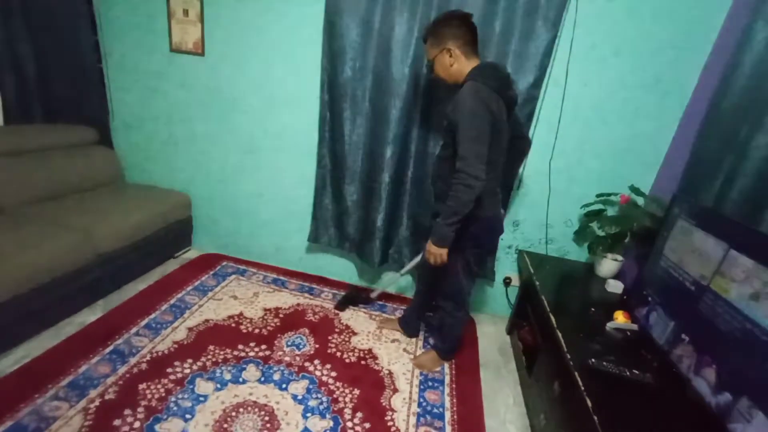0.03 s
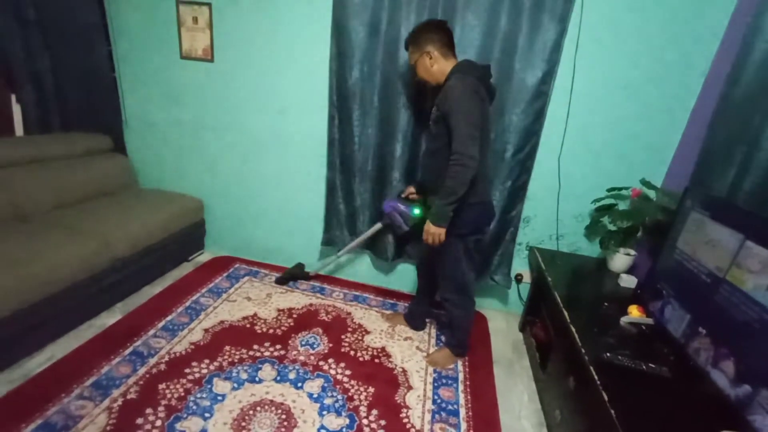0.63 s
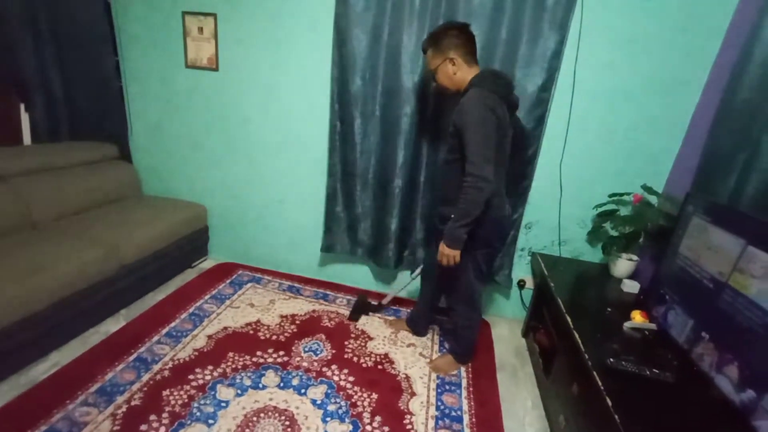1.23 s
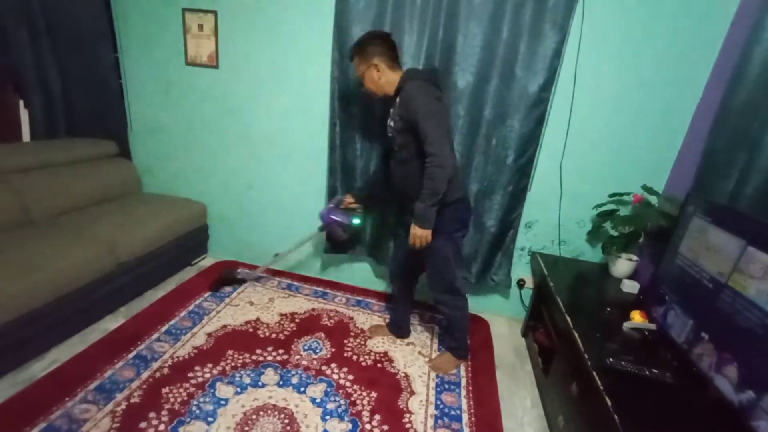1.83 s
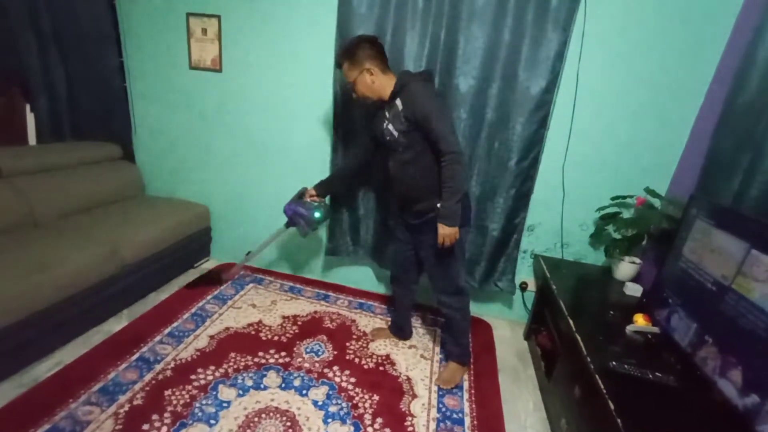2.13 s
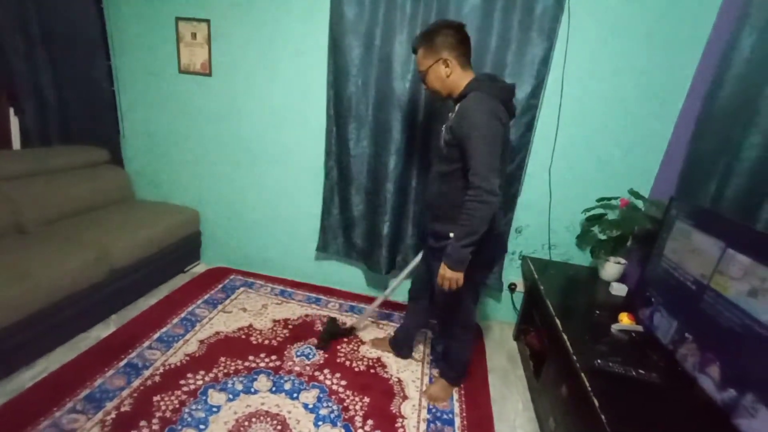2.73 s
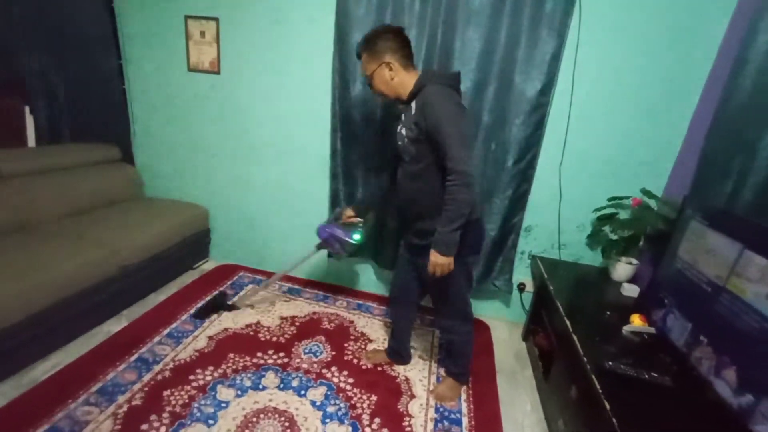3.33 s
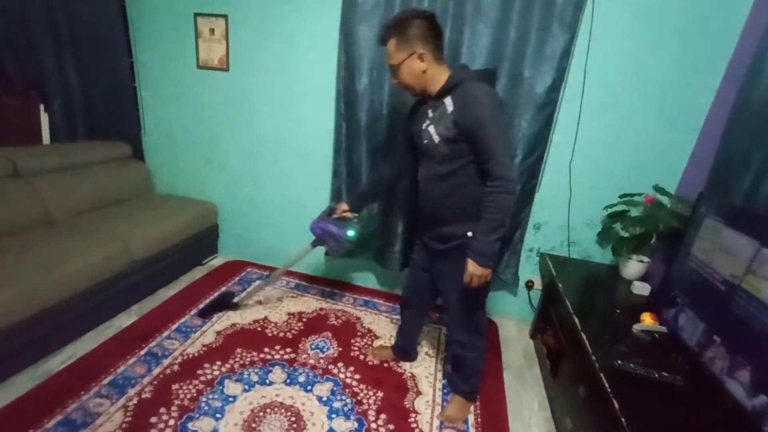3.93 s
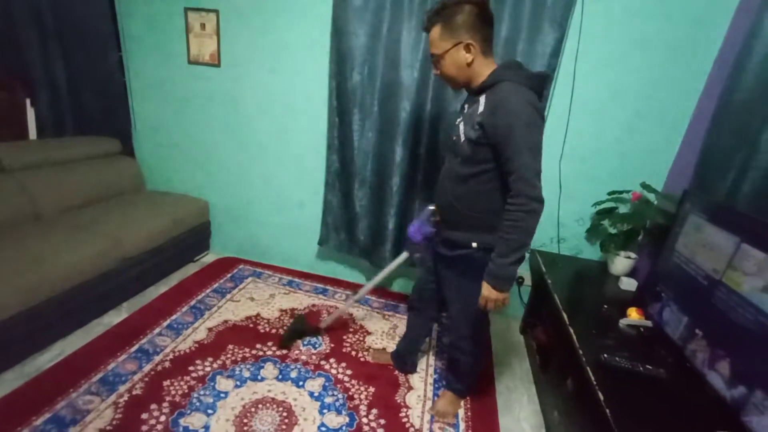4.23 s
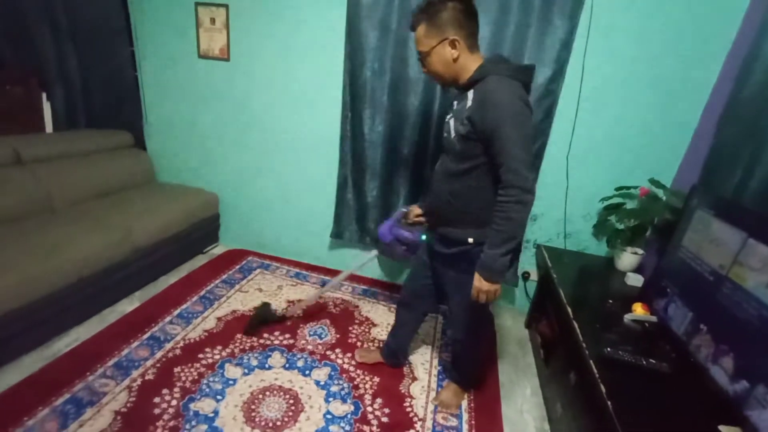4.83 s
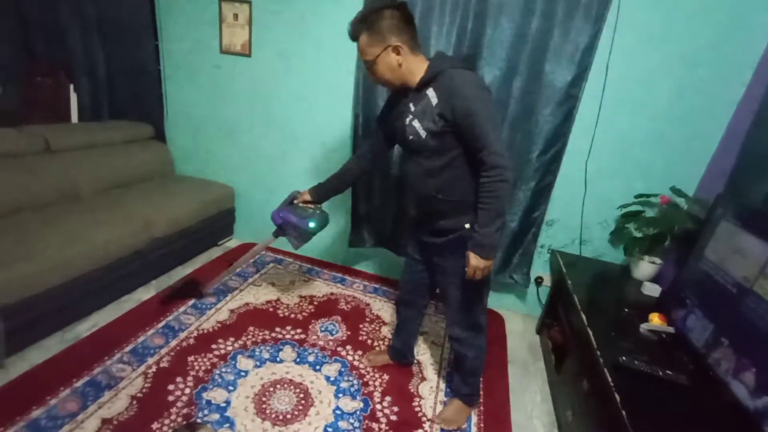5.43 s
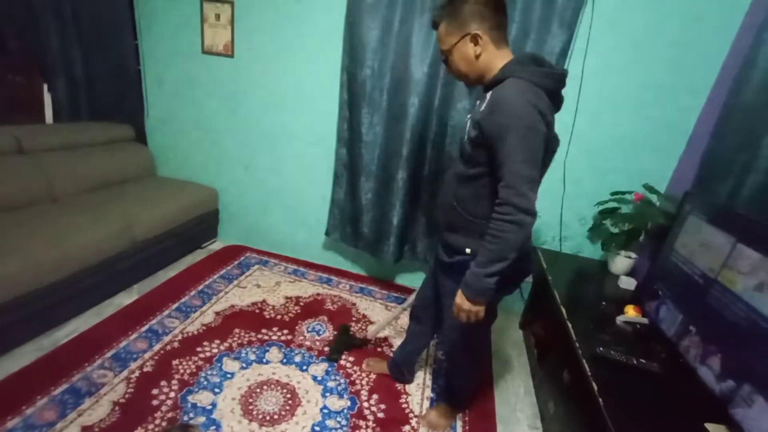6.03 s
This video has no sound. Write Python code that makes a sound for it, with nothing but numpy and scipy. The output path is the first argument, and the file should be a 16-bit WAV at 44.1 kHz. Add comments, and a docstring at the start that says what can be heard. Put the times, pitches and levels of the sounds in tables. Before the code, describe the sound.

The whine and hiss of a cordless vacuum cleaner fill a small room, heard slightly to the left. The plastic head knocks lightly near the start, then moves back and forth over a rug, the suction swelling and fading with soft hoots at the nozzle. Faint bumps and brief hisses come now and then. Late on, the motor rises in pitch and holds the faster speed.

```python
"""A motor's whine and a rush of air: a cordless stick vacuum is pushed to and fro over a rug in a small room.
The whine is the harmonic series of the shaft, each order fading as the strokes cross standing waves.
Turbulence rushes through the body, and the nozzle's cavities howl and hoot as the lip seals on the rug.
The floor thuds, the head knocks and scuffs, hiss comes in brief puffs, and late on the motor speeds up."""
import sys
import numpy as np
from scipy import signal
from scipy.fft import rfft, irfft, next_fast_len
from scipy.io import wavfile
from scipy.ndimage import uniform_filter1d, map_coordinates

SR = 44100
rng = np.random.default_rng(int(sys.argv[2]) if len(sys.argv) > 2 else 0)


def file_out(sig):
    """Save sig as 16-bit WAV at sys.argv[1]."""
    # one column per channel
    cols = np.atleast_2d(sig).T
    # limit, then scale
    lim = np.clip(cols, -1, 1)
    pcm = np.round(lim * 32767).astype(np.int16)
    wavfile.write(sys.argv[1], SR, pcm)


N = 268613

# strokes of the arm: (time [s], reach [0 drawn back, 1 pushed out])
STROKES = [(0, 0.059), (.38, 0.0076), (.68, 0.95), (1.05, 0.61), (1.27, 0.084), (1.45, 0.01), (1.72, 0.78),
           (2.05, 0.78), (2.35, 0.54), (2.85, 0.13), (3.2, 0.64), (3.65, 0.99), (4, 0.41), (4.65, 0.19),
           (4.95, 0.079), (5.2, 0.95), (5.55, 0.56), (6.05, 0.25)]


def amp(db):
    """Decibels to amplitude ratio."""
    return np.exp(np.asarray(db) * np.log(10) / 20)


def unit(x):
    """Normalisation to rms 1."""
    return x / np.sqrt(np.mean(np.abs(x) ** 2) + 1e-20)


def along(points, hz):
    """Interpolation of (frequency [Hz], value) points on a logarithmic axis."""
    frequencies, values = np.transpose(points)
    return np.interp(np.log(hz + 1), np.log(frequencies + 1), values)


def curve(points):
    """Linear interpolation of (time [s], value) points at every sample."""
    return np.interp(np.arange(N) / SR, *np.transpose(points))


def wobble(rate):
    """Band-limited fluctuation: a spline through `rate` Gaussian knots a second."""
    knots = rng.standard_normal(2048)
    coarse = np.arange(0, N + 32, 32)
    points = map_coordinates(knots, [coarse * rate / SR + 2], mode="wrap")
    return np.linspace(points[:-1], points[1:], 32, endpoint=False, axis=1).ravel()[:N]


def filtered(x, response):
    """Linear filtering: the spectrum of x times a frequency response."""
    size = next_fast_len(N + SR // 4)
    return irfft(rfft(x, size) * response(np.fft.rfftfreq(size, 1 / SR)), size)[..., :N]


def resonance(f, centre, width):
    """Band-pass response of a damped oscillator."""
    return 1j * f * width / (centre ** 2 - f ** 2 + 1j * f * width)


def noise_band(hz, width_hz):
    """Random excitation of two like resonators in series, at rms 1."""
    return unit(filtered(rng.standard_normal(N), lambda f: resonance(f, hz, width_hz) ** 2))


def turbulence(spectrum, patchy_db):
    """Coloured noise of rms 1 whose level drifts in patches of time and frequency."""
    cells = signal.stft(rng.standard_normal(N), nperseg=1024)[2]
    patches = uniform_filter1d(rng.standard_normal(cells.shape), size=5, axis=0)
    patches = uniform_filter1d(patches, size=12, axis=1)
    noise = signal.istft(cells * amp(patchy_db * unit(patches)), nperseg=1024)[1][:N]
    return unit(filtered(noise, lambda hz: amp(along(spectrum, hz))))


def partial(phase, scatter, rate, room=1):
    """Random modulation: a tone of rms 1 from a steady plus a scattered phasor, times the room's gain."""
    phasor = room * (1 + scatter * (wobble(rate) + 1j * wobble(rate)))
    angle = phase + rng.uniform(0, 2 * np.pi)
    return unit(phasor.real * np.cos(angle) - phasor.imag * np.sin(angle))


def standing_waves(hz, reflected, stroke_m=0.6, sway_m_per_s=0.35, sound_m_per_s=343):
    """Interference of the direct wave with eight reflections gives a moving source a complex gain."""
    travel_m = np.cumsum(stroke_m * np.abs(np.gradient(curve(STROKES))) + sway_m_per_s / SR)
    coarse = np.arange(0, N, 64)
    wavelengths = travel_m[coarse] * hz / sound_m_per_s
    slant, offset = rng.uniform(-1, 1, (2, 8, 1))
    walls = unit(np.exp(2j * np.pi * (slant * wavelengths + offset)).sum(axis=0))
    return unit(np.interp(np.arange(N), coarse, 1 + reflected * walls))


def drive():
    """Rotation sets the fundamental: shaft rate [Hz], and power from 0 (slowest) to 1 (fastest)."""
    # (time [s], shaft rate [Hz])
    shaft_rates = [(0, 440.2), (0.4, 441.3), (1.6, 440.4), (2.05, 441.2), (2.45, 444.7), (2.85, 443.8),
                   (3.2, 441), (4.1, 441.3), (4.54, 442.6), (5, 494), (5.45, 553), (5.62, 560.3),
                   (6.09, 562.2)]
    speed = uniform_filter1d(curve(shaft_rates), size=2205)
    return speed, np.clip((speed - speed.min()) / np.ptp(speed), 0, 1)


def treble_swing():
    """Slow amplitude modulation common to the treble sources, in dB about its mean."""
    # (time [s], level [dB])
    treble_levels = [(0.0, -56), (0.2, -55.5), (0.54, -58.5), (0.69, -66.5), (0.84, -62.5), (0.93, -68),
                     (1.08, -63), (1.16, -58), (1.56, -59), (1.71, -65), (1.88, -60.5), (2.0, -61),
                     (2.3, -59), (2.55, -66), (2.75, -60.5), (2.81, -58.5), (3.09, -58.5), (3.2, -65),
                     (3.47, -61.5), (3.58, -62), (3.7, -61.5), (4.1, -59.5), (4.26, -63.5), (4.32, -60),
                     (4.55, -58), (4.85, -61.5), (5.32, -56), (5.57, -53), (5.68, -55), (5.76, -55.5),
                     (5.82, -58.5), (5.91, -58), (6.05, -53.5)]
    db = curve(treble_levels)
    return db - db.mean()


def imbalance(turn, shaft_hz, power):
    """Rotating imbalance radiates a hum at the shaft rate and at its low harmonics."""
    # orders 1, 2, 3 and 5, each: (time [s], level [dB])
    hum_levels = [(0.0, -45.5), (0.18, -42.5), (0.28, -54), (0.58, -42.5), (0.88, -43.5), (1.08, -39),
                  (1.22, -53), (1.31, -44.5), (1.7, -43), (1.97, -47), (2.29, -43.5), (2.318, -51),
                  (2.34, -42), (2.5, -43.5), (2.62, -51.5), (2.86, -54), (2.93, -62), (3.01, -72),
                  (3.06, -49), (3.14, -49), (3.2, -51), (3.25, -44), (3.33, -42.5), (3.71, -53),
                  (3.74, -60.5), (4.04, -42), (4.22, -63), (4.36, -44), (4.59, -45), (4.62, -74),
                  (4.65, -42), (4.7, -34), (4.86, -33), (5.07, -52.5), (5.19, -41.5), (5.51, -34.5),
                  (5.63, -46.0), (5.83, -29.5), (6.09, -36.5)]
    octave_levels = [(0.0, -36), (0.12, -31), (0.18, -44), (0.21, -31.5), (0.4, -34.5), (0.49, -48),
                     (0.55, -40), (0.6, -48), (0.91, -37.5), (1.04, -46), (1.23, -35), (1.51, -36),
                     (1.65, -45), (2.22, -52), (2.32, -40.5), (2.59, -35), (2.66, -53.0), (2.75, -36),
                     (3.05, -33), (3.14, -46), (3.17, -37.0), (3.69, -53.5), (3.74, -44.5), (4.0, -34),
                     (4.09, -41), (4.5, -34), (4.57, -41.5), (4.62, -31.5), (4.72, -32), (4.77, -48),
                     (4.84, -39.5), (4.89, -36), (4.98, -39), (5.02, -37.5), (5.09, -36.5), (5.17, -57),
                     (5.27, -41.5), (5.41, -43.5), (5.58, -32), (5.67, -39.5), (5.75, -29.5), (5.84, -44),
                     (5.88, -35.5), (5.95, -41.5), (6.0, -32.5), (6.09, -31.5)]
    third_levels = [(0, -40), (.08, -53), (.42, -45), (.49, -39.5), (.58, -53), (1.44, -50.5),
                    (1.56, -40.5), (1.66, -55.5), (1.96, -42), (2.33, -50), (2.46, -36.5), (2.67, -49.5),
                    (3.12, -39), (3.199, -53), (3.25, -42.5), (3.5, -55), (4, -40.5), (4.22, -48.5),
                    (4.32, -41.5), (4.68, -46.5), (4.75, -48.5), (4.82, -41.5), (5.02, -44.5), (5.08, -49),
                    (5.3, -44), (5.36, -49), (5.93, -60), (5.999, -46), (6.08, -39)]
    fifth_levels = [(0.0, -42), (0.13, -50.5), (0.22, -44), (0.34, -43), (0.44, -55), (0.48, -46.5),
                    (0.91, -47), (0.951, -57), (1.21, -40), (1.411, -41.5), (1.5, -52), (1.61, -42),
                    (1.77, -55), (1.829, -45), (2.0, -52), (2.04, -45.5), (2.44, -46.5), (2.56, -57.5),
                    (2.63, -42), (3.1, -42), (3.159, -51.5), (3.48, -47), (3.51, -58), (3.891, -37),
                    (4.04, -45.5), (4.3, -47), (4.329, -38), (4.409, -52), (4.57, -45.5), (4.66, -55),
                    (4.96, -57.5), (5.01, -41), (5.05, -53), (5.14, -44.5), (5.769, -36.5), (5.8, -48.5),
                    (5.999, -37), (6.09, -60)]
    hum_db = curve(hum_levels)
    room = standing_waves(shaft_hz, reflected=0.047)
    out = amp(hum_db) * partial(turn, scatter=0.19, rate=45, room=room)
    # air stirred by the shaft adds a rough skirt to the hum
    out += amp(hum_db - 18.5 - 5.2 * power) * partial(turn, scatter=3.1, rate=190)
    # in mid climb the octave breaks up, and rough airflow surrounds it
    climbing = np.sin(np.pi * power)
    octave = amp(curve(octave_levels) - 1.6 * power)
    room = standing_waves(2 * shaft_hz, reflected=0.17)
    out += octave * partial(2 * turn, scatter=0.14 + 0.16 * power + 0.24 * climbing, rate=60, room=room)
    out += octave * climbing * amp(-6) * partial(2 * turn, scatter=4, rate=150.4)
    for order, levels in ((3, third_levels), (5, fifth_levels)):
        room = standing_waves(order * shaft_hz, reflected=0.14)
        out += amp(curve(levels)) * partial(order * turn, scatter=0.32, rate=40, room=room)
    return out


def resonant_orders(turn, shaft_hz, power, peak_width=0.13):
    """Resonance lifts the fourth order and the blades' octave as each climbs through a peak of the body."""
    # (order, low-power level [dB], power at the peak [0-1], boost there [dB], full-power level [dB],
    #  change at full reach [dB], reflected amplitude [ratio])
    orders = [(4, -53, 0.55, 17, -55, -5, 0.26), (14, -56.5, 0.56, 8, -45, -7, 0.39)]
    out = np.zeros(N)
    for order, low_db, peak_power, boost_db, full_db, reach_db, reflected in orders:
        on_peak = np.exp(-((power - peak_power) / peak_width) ** 2)
        db = low_db + power * (full_db - low_db) + boost_db * on_peak + reach_db * curve(STROKES)
        room = standing_waves(order * shaft_hz, reflected)
        out += amp(db) * partial(order * turn, scatter=0.56, rate=38, room=room)
    return out


def impeller(turn, shaft_hz, power, blades=7):
    """Pressure pulses sound the blade-passing frequency; turbulence spreads a rough skirt around it."""
    # (time [s], level [dB])
    blade_levels = [(0.0, -38), (0.26, -46.5), (0.35, -33.5), (0.44, -46.5), (0.47, -37.5), (0.57, -35),
                    (0.65, -50), (0.68, -38), (0.85, -46), (0.99, -36.5), (1.03, -44.5), (1.09, -34),
                    (1.36, -53.5), (1.5, -38.5), (1.64, -50), (1.69, -28.5), (1.74, -37), (1.8, -37),
                    (1.89, -53), (1.92, -30.5), (2.0, -34), (2.04, -43.5), (2.15, -35), (2.23, -55),
                    (2.29, -33), (2.45, -34.5), (2.497, -48), (2.53, -33), (2.555, -46), (2.6, -45),
                    (2.66, -52), (2.69, -37.5), (2.76, -30.5), (2.91, -43.5), (3.09, -37), (3.13, -40.5),
                    (3.22, -33.5), (3.32, -45), (3.36, -32), (3.48, -34), (3.51, -37), (3.535, -49),
                    (3.57, -39.5), (3.64, -31.5), (3.83, -40.5), (3.91, -32), (4.05, -48), (4.08, -39),
                    (4.21, -47), (4.24, -35), (4.4, -46), (4.43, -37.5), (4.57, -34.5), (4.92, -40.5),
                    (4.95, -45), (5.19, -38.5), (5.42, -48), (5.58, -39), (5.77, -48.5), (5.99, -43.5),
                    (6.09, -50)]
    db = curve(blade_levels)
    room = standing_waves(blades * shaft_hz, reflected=0.2)
    tone = amp(db) * partial(blades * turn, scatter=0.19 + 0.24 * power, rate=70, room=room)
    skirt_db = -50.5 + 2.1 * power + 0.081 * (db - db.mean())
    return tone + amp(skirt_db) * partial(blades * turn, scatter=5.1, rate=330)


def overtones(turn, power):
    """Directivity grows with frequency: the highest orders beam from the vent and swell with its hiss."""
    # (shaft multiple [rounded to a whole order], low-power level [dB], full-power level [dB])
    weak_orders = [(6, -61, -47), (8.006, -66, -53), (9.15, -66, -82), (9.99, -60.5, -58), (11, -69, -72),
                   (12.08, -78, -58), (12.97, -63.5, -49.5), (14.9, -56.5, -57.5), (16.1, -64, -75),
                   (16.75, -68, -82), (17.74, -69, -76), (19.1, -84, -69), (20, -72, -64), (21, -74.5, -70),
                   (22, -77, -81), (24, -91, -65), (25, -75, -66), (26, -90, -63), (27, -74, -76),
                   (28, -78, -78), (30, -75, -76)]
    facing_db = 1.42 * treble_swing() - 5 * power
    dip_db = np.sin(np.pi * power) + 0.3
    out = np.zeros(N)
    for order, low_db, full_db in weak_orders:
        beam = np.clip((order - 6) / 14, 0, 1)
        db = low_db + power * (full_db - low_db) + beam * facing_db + 2.84 * wobble(9) - dip_db
        out += amp(db) * partial(round(order) * turn, scatter=1.4, rate=20 + 18 * beam)
    return out


def motor(speed, power):
    """Periodic motion gives a harmonic series: every order follows one slightly jittering shaft angle."""
    turn = 2 * np.pi * np.cumsum(speed * (1 + 0.00077 * wobble(60))) / SR
    shaft_hz = np.median(speed)
    return (imbalance(turn, shaft_hz, power) + resonant_orders(turn, shaft_hz, power)
            + impeller(turn, shaft_hz, power) + overtones(turn, power))


def airflow(power):
    """Turbulent flow radiates broadband noise: body and exhaust grow with power under a bright hiss."""
    # spectra, each: (frequency [Hz], relative spectral level [dB])
    body_spectrum = [(25, -35), (60, -28), (110, -20), (200, -16), (330, -14.5), (420, -3.5), (540, -6.5),
                     (780, -1.5), (1100, -0.5), (1420, 2.5), (1650, -3.5), (2380, -6), (2850, -1),
                     (3300, -8.5), (4200, -28), (9000, -57)]
    exhaust_spectrum = [(1500, -45), (3000, 7.5), (3500, 4.5), (4300, 6), (5100, 0), (5800, 5), (6800, 6),
                        (7600, 1.5), (8400, -7.5), (10000, -50)]
    hiss_spectrum = [(3000, -15), (6000, -9), (8000, -9), (9000, 10.5), (10200, 13), (11400, 6), (12500, 9),
                     (14000, 12), (15400, 17)]
    swing_db = treble_swing()
    body_db = -42 + 0.5 * power + 0.2 * swing_db + 0.5 * wobble(12)
    body = amp(body_db) * turbulence(body_spectrum, patchy_db=2.5)
    exhaust_db = -47 + 2.5 * power + 0.52 * swing_db + 0.99 * wobble(30)
    exhaust = amp(exhaust_db) * turbulence(exhaust_spectrum, patchy_db=2)
    grain_db = 1.7 * wobble(45) + 1.5 * wobble(260)  # fast random grain in the hiss's level
    return body + exhaust + amp(-56 + swing_db + grain_db) * turbulence(hiss_spectrum, patchy_db=2.5)


def nozzle(rise, power, unseal_db=-9.5):
    """Cavity resonance: the nozzle howls as its lip seals on the rug."""
    # cavity modes at low power: (frequency [Hz], nominal width [Hz], relative level [dB])
    modes = [(866, 47, -2.5), (935.6, 46, 2), (1027, 120, -12), (1128, 7.9, 3), (1848, 22, -8.5),
             (1986, 32, -6)]
    cavities = lambda f: sum(amp(db) * resonance(f, hz, 1.18 * width) ** 2 for hz, width, db in modes)
    howl = unit(filtered(rng.standard_normal(N), cavities))
    howl = np.interp(np.cumsum(rise), np.arange(N), howl, period=N)  # faster air, higher pitch
    seal_db = unseal_db * curve(STROKES) + 3.6 * wobble(17)  # the lip lifts at full reach
    return amp(-45 + seal_db + 0.5 * power) * howl


def thin_whine(rise, low_power_hz=999):
    """Amplitude modulation: a thin whine near 1 kHz, probably the brush motor, swells and fades."""
    # (time [s], level [dB])
    whine_levels = [(0, -45.5), (.41, -39.5), (.7, -58), (1.09, -56), (1.22, -39.5), (1.43, -38.5),
                    (1.62, -54), (1.8, -44), (2.15, -46), (2.5, -61), (2.6, -45), (3, -60), (3.42, -43),
                    (3.6, -58), (4.03, -43.5), (4.6, -42), (4.8, -59), (6.09, -43)]
    pitch = low_power_hz * rise * (1 + 0.00408 * wobble(35))
    return amp(curve(whine_levels)) * partial(2 * np.pi * np.cumsum(pitch) / SR, scatter=0.45, rate=60)


def suction():
    """Flow through a porous layer turns turbulent: air roars in the rug's pile."""
    # (time [s], level [dB])
    roar_levels = [(0, -51), (.35, -44), (.92, -55), (1.12, -46.5), (1.4, -60), (2.48, -58), (2.62, -46),
                   (3.15, -49.5), (3.38, -50), (4.1, -66), (4.27, -42), (4.44, -49.5), (4.58, -47),
                   (5.25, -52), (5.57, -42), (5.72, -50), (6.09, -47.5)]
    # (frequency [Hz], relative spectral level [dB])
    pile_spectrum = [(480, -37), (620, -10.5), (765, 2.5), (850, -1), (1130, -9), (1400, -8), (2200, -32.5)]
    return amp(curve(roar_levels) + 0.5) * turbulence(pile_spectrum, patchy_db=3.5)


def diffuse_field():
    """Sound arriving from all sides: treble noise over a faint rumble."""
    # (frequency [Hz], relative spectral level [dB])
    spectrum = [(100, -18), (400, -19), (6000, -21), (8000, 1), (12000, -1), (15000, 0)]
    return amp(-64 + treble_swing()) * turbulence(spectrum, patchy_db=0)


def thuds():
    """Soft impacts excite a heavily damped vibration of the floor: a low tone in a boom of noise."""
    # (time [s], relative level [dB], frequency [Hz])
    bumps = [(0.06, -63, 105), (1.736, -61, 180), (2.489, -50, 85), (2.513, -56, 100), (3.479, -59, 175),
             (5.682, -62, 124.7)]
    t, out = np.arange(N) / SR, np.zeros(N)
    for start, db, hz in bumps:
        age = np.clip(t - start, 0, 1)
        tone = np.sin(2 * np.pi * hz * age) * amp(-60 * age / 0.067)
        boom = noise_band(hz, 1.1 * hz) * amp(-60 * age / 0.085) * (1 - np.exp(-age / 0.0015))
        out += 2 * amp(db) * (tone + boom)
    return out


def knocks():
    """Impact excites free vibration: the plastic head lands with a crack and its shell's modes ring down."""
    # (time [s], relative level [dB])
    landings = [(.5545, -25), (0.5605, -17), (0.567, -22)]
    # (frequency [Hz], relative level [dB], time to fall 60 dB [s])
    shell_modes = [(773, -2, 0.046), (920, 1, 0.035), (1130, 1, 0.032), (1390, -14, 0.023),
                   (2820, -9, .015)]
    # (frequency [Hz], relative spectral level [dB])
    crack_spectrum = [(100, -40), (500, -20), (1100, 5), (1700, -3), (3000, -2), (7000, -8),
                      (9500, -30), (14000, -38)]
    crack = turbulence(crack_spectrum, patchy_db=1.5)
    age, out = np.arange(SR // 8) / SR, np.zeros(N)
    burst = amp(-60 * age / 0.014) * (1 - np.exp(-age / 0.00031))
    ring = sum(amp(db - 60 * age / t60) * np.sin(2 * np.pi * hz * age) for hz, db, t60 in shell_modes)
    radiation = signal.butter(2, 350, "highpass", fs=SR, output="sos")  # a small shell gives little bass
    ring = signal.sosfilt(radiation, ring * (1 - np.exp(-age / 0.0005)))
    for start, db in landings:
        span = round(start * SR) + np.arange(len(age))
        out[span] += 0.35 * amp(db) * (ring + burst * crack[span])
    return out


def scuffs(attack_s=0.0073, release_s=0.03, judder_db=1.5):
    """Friction between head and pile makes short, juddering bursts of noise."""
    # (time [s], level [dB], duration [s], centre frequency [Hz], nominal width [Hz])
    drags = [(0.575, -38.5, 0.1, 1070, 647), (0.576, -44.5, 0.11, 447, 330), (0.6, -56.5, 0.12, 250, 150),
             (0.765, -41, 0.031, 1050, 500), (5.392, -53, 0.055, 306, 85), (5.451, -53.5, 0.07, 258, 130),
             (5.541, -47, 0.049, 306, 80), (5.863, -56, 0.061, 130, 140)]
    t, out = np.arange(N) / SR, np.zeros(N)
    for start, db, length, hz, width_hz in drags:
        attack = np.clip((t - start) / attack_s, 0, 1)
        release = np.clip((start + length - t) / release_s + 0.5, 0, 1)
        rub = noise_band(hz, 0.96 * width_hz) * amp(judder_db * wobble(130))
        out += amp(db) * attack * release * unit(rub)
    return out


def hoots():
    """Self-sustained oscillation: as the lip catches, the cavity locks into a wavering note and octave."""
    # (midpoint time [s], level [dB], half-duration [s], pitch [Hz], octave relative to the note [dB])
    catches = [(1.055, -41.5, 0.23, 926, -21), (2.25, -41, 0.18, 939, -9), (2.425, -43.5, 0.17, 950, -4),
               (2.633, -41.5, 0.19, 944, -17), (3.567, -42, 0.2, 927, -20), (3.919, -44, 0.13, 930, -2.5),
               (4.21, -42.5, 0.22, 946, -4.5), (5.438, -39, 0.15, 1045, -0.5)]
    t, out = np.arange(N) / SR, np.zeros(N)
    wavering_time = np.cumsum(1 + 0.00603 * wobble(30)) / SR
    for middle, db, half_length, hz, octave_db in catches:
        swell = np.cos(np.pi / 2 * np.clip((t - middle) / half_length, -1, 1)) ** 2
        phase = 2 * np.pi * hz * wavering_time
        note = partial(phase, scatter=1, rate=50)
        octave = amp(octave_db) * partial(2 * phase, scatter=1.1, rate=110)
        out += amp(db) * swell * (note + octave)
    return out


def hiss_puffs(rise_s=0.0057, t60_s=0.15):
    """Exponential envelopes shape short, bright puffs of hiss that rise quickly and die away."""
    # (time [s], relative level [dB])
    puffs = [(1.579, -46), (1.774, -42.5), (1.936, -43), (2.876, -46), (5.745, -41)]
    # (frequency [Hz], relative spectral level [dB])
    puff_spectrum = [(500, -18), (1200, -4), (3000, 8), (6500, 12), (9000, 4), (12000, 4), (15000, 8)]
    t, out = np.arange(N) / SR, np.zeros(N)
    hiss = turbulence(puff_spectrum, patchy_db=1)
    for start, db in puffs:
        age = np.clip(t - start, 0, 1)
        out += amp(db + 2 - 60 * age / t60_s) * (1 - np.exp(-age / rise_s)) * hiss
    return out


def scene():
    """Superposition in two channels; a level difference makes the left louder and the right brighter."""
    # (frequency [Hz], left minus right level [dB])
    balance = [(60, 2), (200, 4.5), (700, 4.5), (1290, 7.5), (2400, 4), (5000, 5), (6300, 1), (7200, -5),
               (8000, -9.5), (9000, -18.5), (11500, -16.5), (13000, -3.5), (15000, -5)]
    speed, power = drive()
    rise = np.sqrt(speed / np.median(speed))  # pitch ratio of the howl and the thin whine
    direct = motor(speed, power) + airflow(power) + nozzle(rise, power) + thin_whine(rise) + suction()
    direct += hoots() + hiss_puffs() + knocks() + thuds() + scuffs()
    diffuse = diffuse_field()

    def pan(hz):
        """Left and right gains whose mean is 1."""
        ratio = amp(along(balance, hz))
        return 2 * np.array([ratio, np.ones_like(hz)]) / (1 + ratio)

    return filtered(np.array([direct + diffuse, direct - diffuse]), pan)


def record(dry):
    """Band limiting: an ideal low-pass filter removes the highest treble."""
    cutoff_hz = 15520
    return filtered(dry, lambda hz: hz < cutoff_hz)


dry = scene()
out = record(dry)
file_out(out)
```